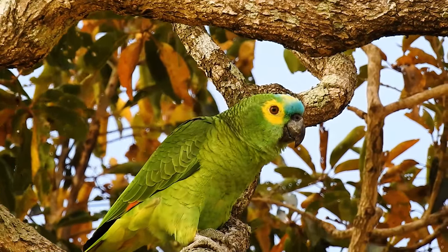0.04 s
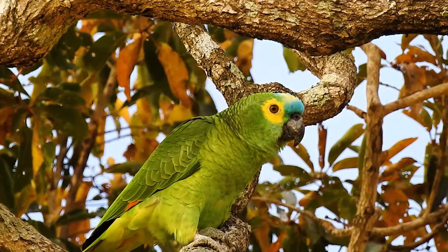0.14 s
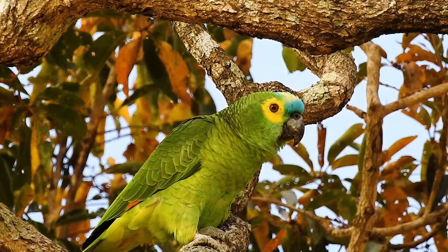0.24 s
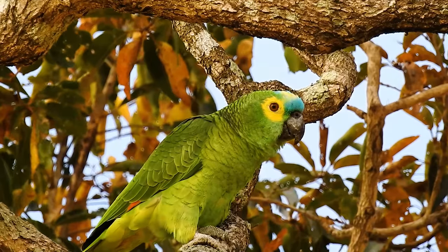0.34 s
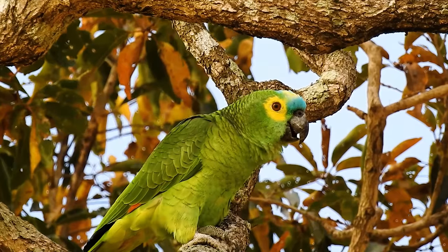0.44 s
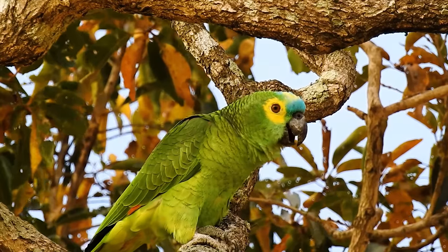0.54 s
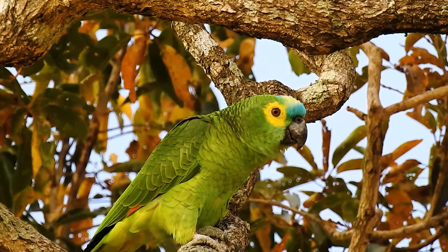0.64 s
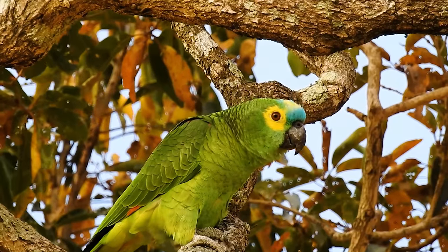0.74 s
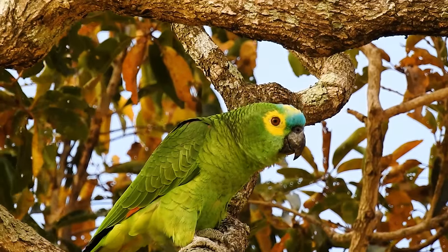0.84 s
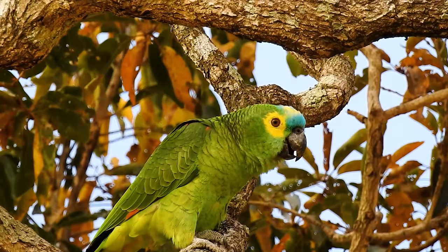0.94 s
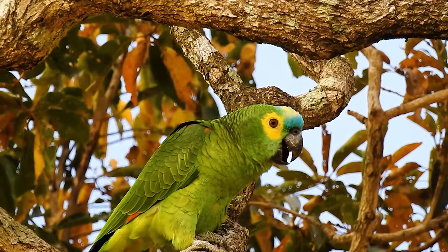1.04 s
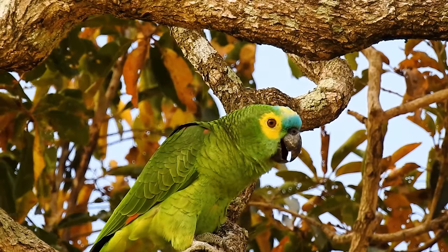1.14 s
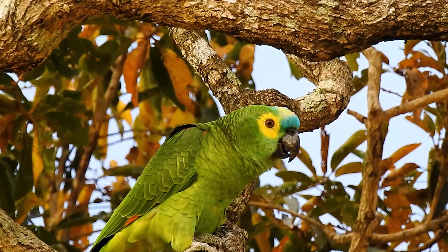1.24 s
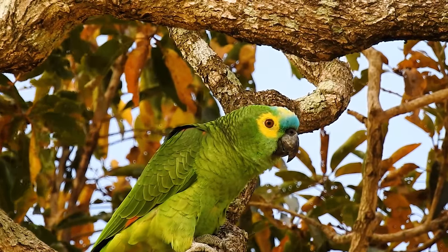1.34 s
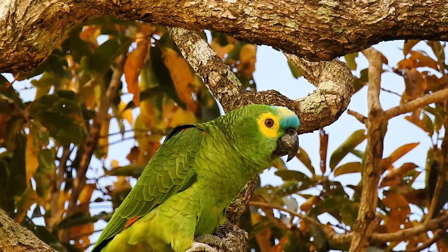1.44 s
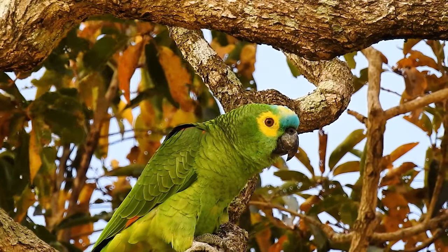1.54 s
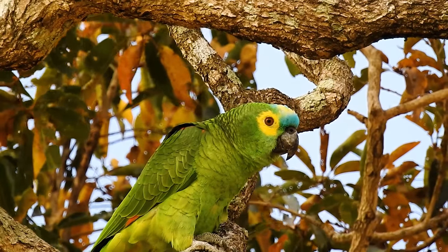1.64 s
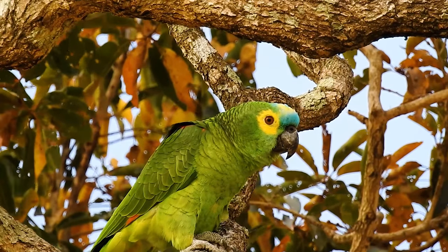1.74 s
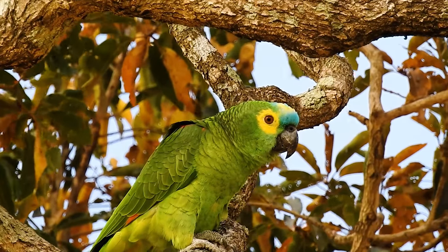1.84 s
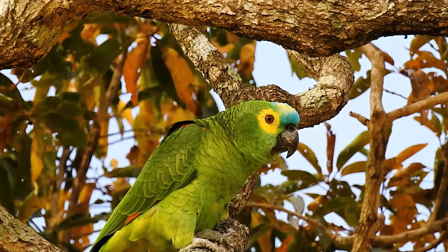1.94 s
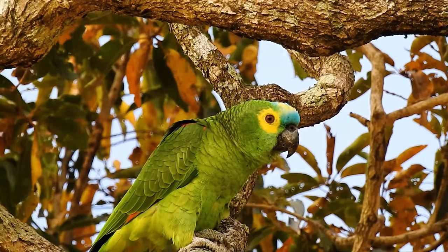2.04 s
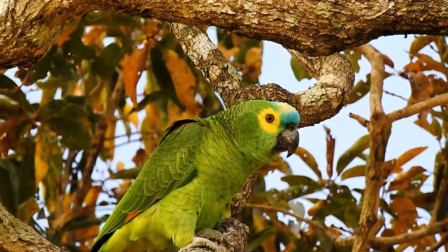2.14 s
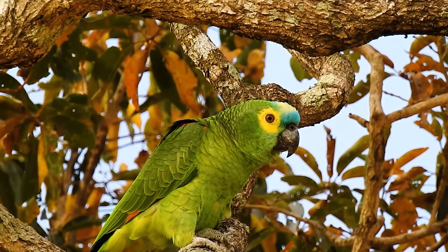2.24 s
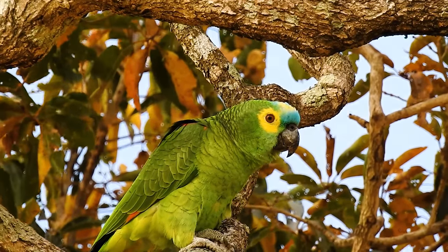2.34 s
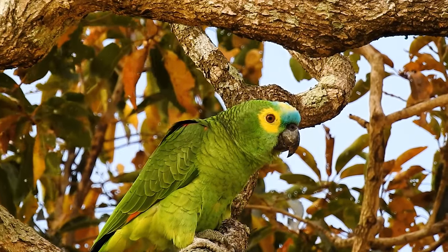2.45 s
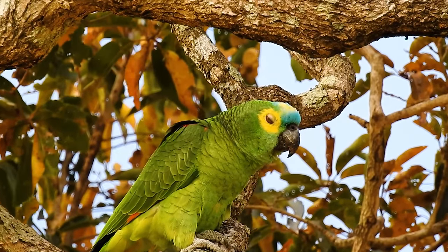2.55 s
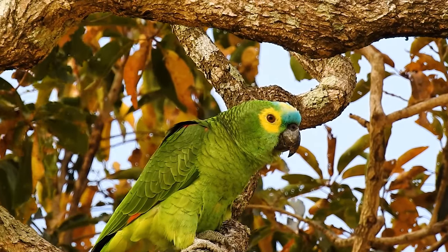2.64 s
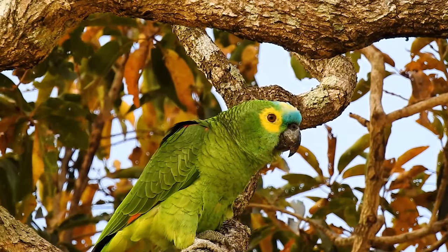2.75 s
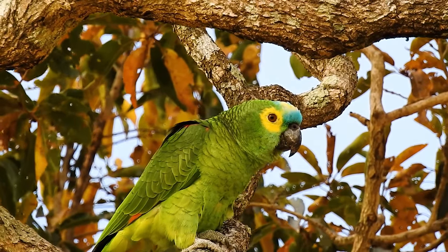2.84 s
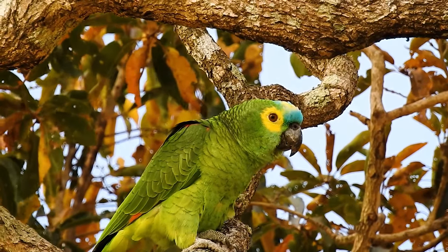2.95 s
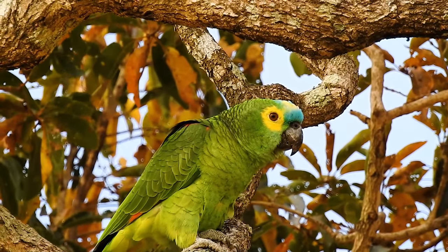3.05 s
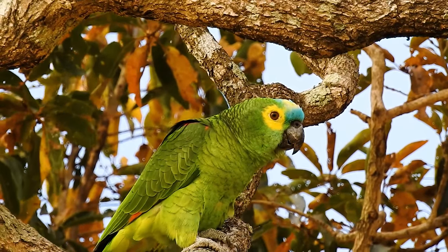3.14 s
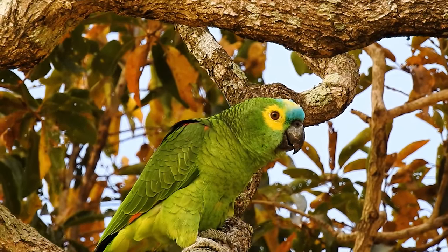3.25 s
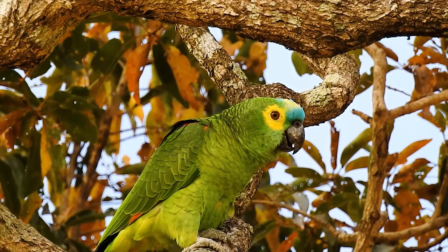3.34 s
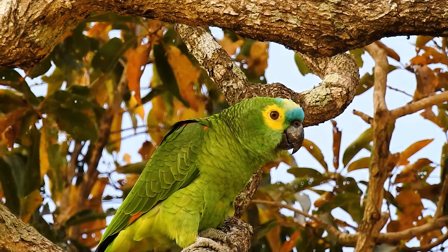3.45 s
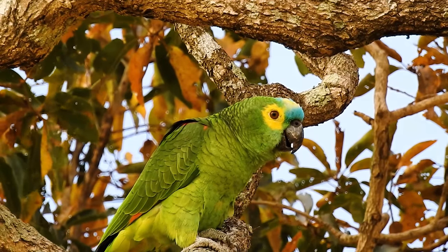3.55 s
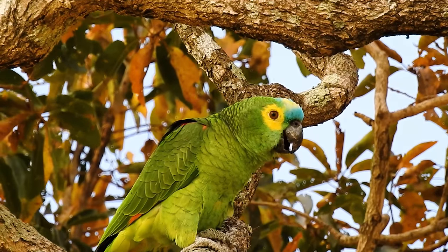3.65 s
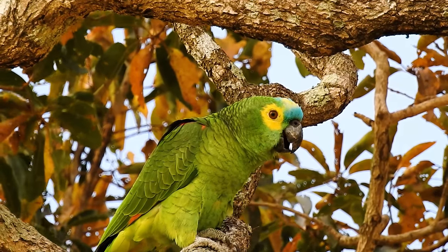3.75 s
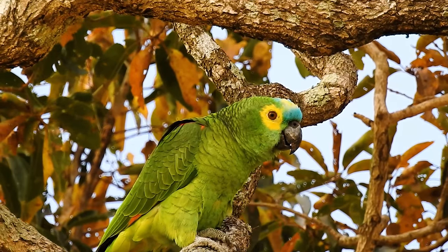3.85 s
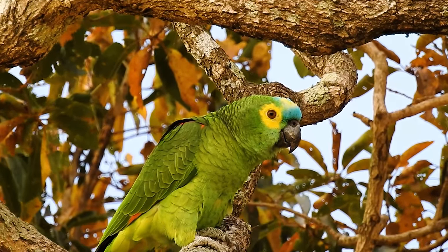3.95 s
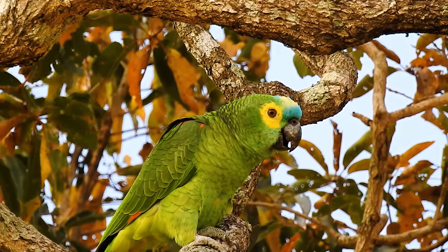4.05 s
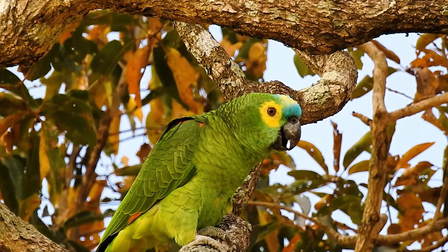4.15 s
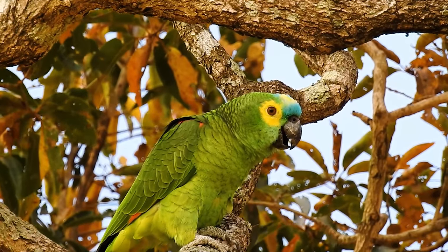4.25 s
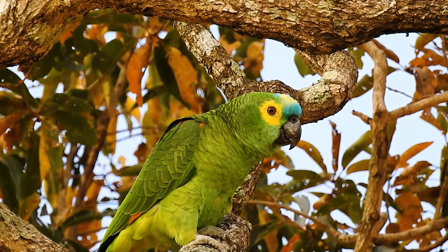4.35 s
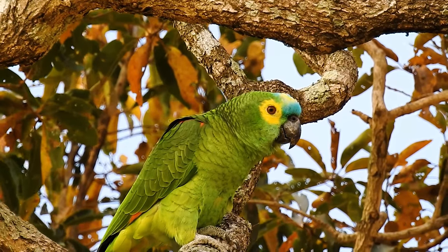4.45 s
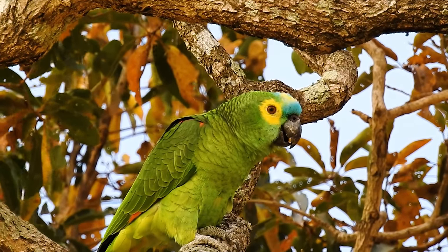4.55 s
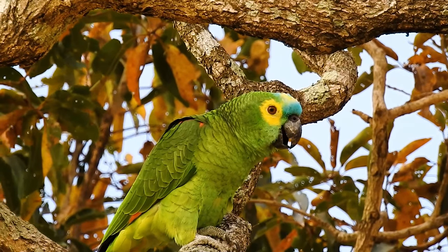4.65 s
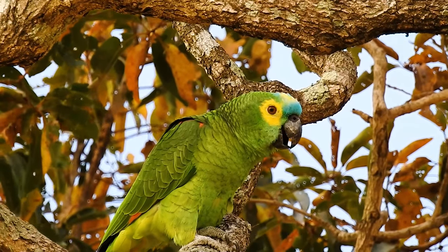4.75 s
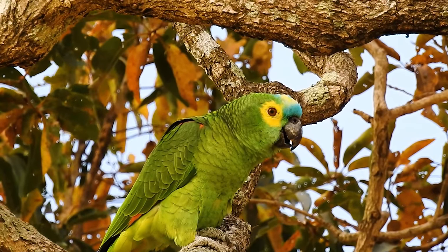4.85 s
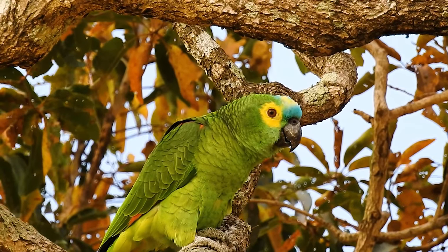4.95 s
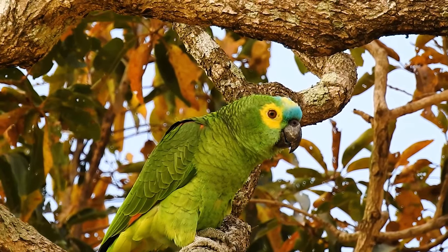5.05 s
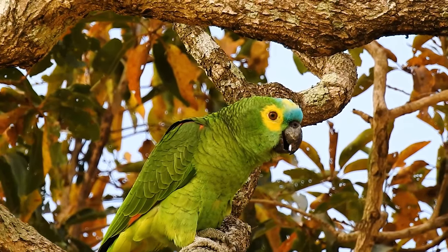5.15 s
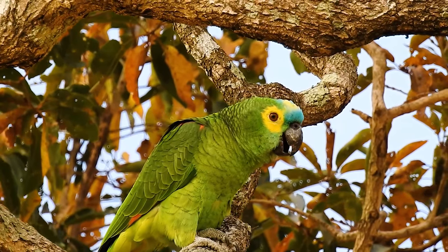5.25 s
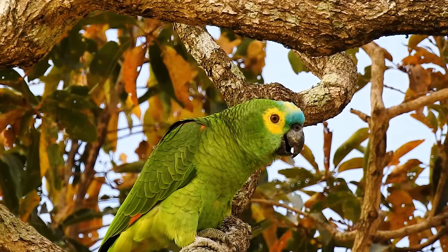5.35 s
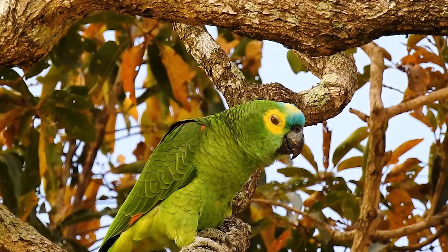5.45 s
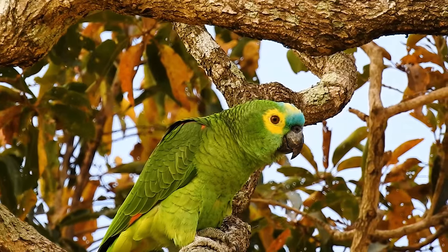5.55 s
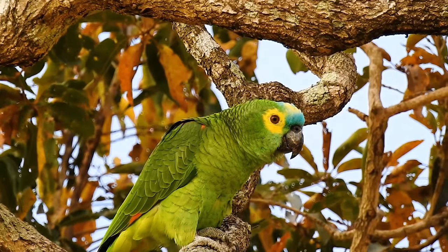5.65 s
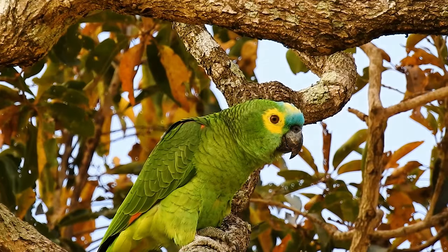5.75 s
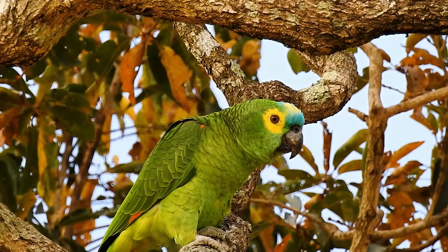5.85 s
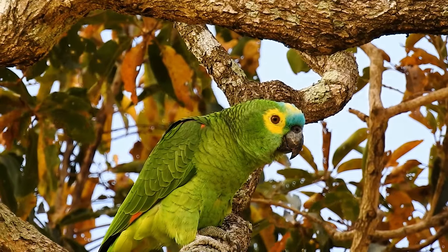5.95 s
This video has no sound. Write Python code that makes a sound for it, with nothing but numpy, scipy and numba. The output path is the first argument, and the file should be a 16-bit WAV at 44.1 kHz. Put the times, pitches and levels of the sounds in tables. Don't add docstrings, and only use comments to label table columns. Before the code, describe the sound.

A parrot in a tree gives harsh squawks, a cracking scream and beak clicks, then four rolled squawks, over faint leaf and insect hiss.

```python
import sys
import numpy as np
from scipy import signal
from scipy.io import wavfile
from scipy.ndimage import uniform_filter1d
from numba import njit

SR = 44100
rng = np.random.default_rng(int(sys.argv[2]) if len(sys.argv) > 2 else 0)


def materialize(psi):
    bounded = np.clip(np.atleast_2d(psi).T, -1, 1)
    quanta = np.round(bounded * 32767).astype(np.int16)
    wavfile.write(sys.argv[1], SR, quanta)


def undo_db(level):
    steps = np.asarray(level, float) / 20
    return 10 ** steps


N = 264159
TIME_S = np.arange(N) / SR

# start [s], length [s], first pitch [Hz], last pitch [Hz], level [dB].
BREAKS = [
    (0.623, 0.009, 1200, 1920, -31),
    (0.63, 0.004, 1987, 1293, -28),
    (0.65, 0.0047, 1380, 2230, -14),
    (0.654, 0.0074, 2120, 1442, -26),
    (0.672, .016, 2147, 2068, -22.5),
    (1.157, .011, 1440, 2090, -26.5),
    (1.162, 0.0051, 2090, 2060, -9),
    (1.223, 0.0081, 2630, 2240, -13),
    (1.265, 0.018, 2568, 2376, -15),
    (3.533, 0.0068, 2276, 2190, -32),
]


def level(x, db):
    return x * undo_db(db) / np.sqrt(np.mean(x ** 2))


@njit
def svf(x, g, k):
    y = x.copy()
    for _ in range(2):
        b, l = 0., 0.
        for i in range(len(x)):
            v = (b + g[i] * (y[i] - l)) / (1 + g[i] * (g[i] + k[i]))
            b, l, y[i] = 2 * v - b, l + 2 * g[i] * v, k[i] * v
    return y


def ring(x, modes):
    flat = np.zeros(len(x))
    out = 0
    for hz, width_hz, db in modes:
        out = out + undo_db(db) * svf(x, np.tan(np.pi * hz / SR) + flat, width_hz / hz + flat)
    return out


def walk(rate_hz):
    hold = int(SR / rate_hz)
    steps = np.repeat(rng.standard_normal(N // hold + 1), hold)
    return 1.5 * uniform_filter1d(uniform_filter1d(steps, hold), hold)[:N]


def whistles(table, wobble_db):
    out, duck_db, waver = np.zeros(N), np.zeros(N), walk(250)
    for start_s, length_s, first_hz, last_hz, db, second_db, third_db, gap_db in table:
        span = slice(int(start_s * SR), int((start_s + length_s) * SR))
        u = np.linspace(0, 1, span.stop - span.start)
        shape = np.clip(np.minimum(u, 1 - u) * length_s / 0.003, 0, 1)
        hz = (first_hz + u * (last_hz - first_hz)) * (1 + 0.004 * waver[span])
        turn = 2 * np.pi * np.cumsum(hz) / SR
        tone = np.sin(turn) + undo_db(second_db) * np.sin(2 * turn) + undo_db(third_db) * np.sin(3 * turn)
        out[span] += shape * undo_db(db + 3 + wobble_db * waver[span]) * tone
        duck_db[span] += shape * gap_db
    return out, duck_db


def woods(bird):
    # frequency [Hz], density [dB per Hz].
    hiss_spectrum = [(180, -71), (300, -46), (877, -8.5), (937, -14.5), (1220, -5.5), (1880, -1.5),
                     (2040, -10.5), (2830, -2.5), (3290, -8), (4280, -1.5), (6690, 2), (8710, -12.5),
                     (15500, -19.5)]
    steady_db, scatter_db, scatter_s = -56.5, -40, 0.12
    out, gust = np.zeros((2, N)), walk(0.22)
    spectrum_hz, spectrum_db = np.transpose(hiss_spectrum)
    for hz in 300 * 2 ** np.arange(0, 5.8, 1 / 3):
        band = [(hz, hz / 3 * (1 + (hz / 12000) ** 2), 0)]
        mid = ring(rng.standard_normal(N), band)
        side = ring(rng.standard_normal(N), band)
        db = np.interp(np.log(hz), np.log(spectrum_hz), spectrum_db) + 0.6 * gust + walk(9)
        bass = np.hypot(1, (950 / hz) ** 2)
        width = min(0.52 + hz / 23000, 1)
        out += undo_db(db) * bass * (mid + width * side * np.array([[1], [-1]]))
    samples = scatter_s * SR
    swell = signal.lfilter([1 / samples], [1, 1 / samples - 1], bird ** 2)
    return level(out, 0) * np.sqrt(undo_db(2 * steady_db) + undo_db(2 * scatter_db) * swell)


def far_birds():
    # start [s], length [s], first pitch [Hz], last pitch [Hz], level [dB].
    chirps = [
        (2.27, 0.05, 1810, 1910, -71),
        (2.34, 0.035, 2010, 1750, -71.5),
        (3.022, 0.068, 2300, 2500, -72),
        (3.103, 0.048, 1570, 1570, -74),
        (5.88, 0.068, 2080, 1893, -69),
    ]
    out, _ = whistles([(*row, -30, -30, 0) for row in chirps], 5.0)
    return out


def far_tree_line(bird):
    t60_s, far_db, ridge_s, ridge_db = 1.5, -28, 0.45, 9
    bump_db = ridge_db * np.exp(-((TIME_S - ridge_s) / 0.022) ** 2)
    patches = rng.standard_normal((2, N)) * undo_db(1.8 * walk(20) + bump_db)
    patches = patches * 0.0015 ** (TIME_S / t60_s) * np.minimum(TIME_S / 0.08, 1)
    band = ring(bird, [(2420, 380, -1.5), (4170, 830, 3.0)])
    echo = np.array([signal.fftconvolve(band, p)[:N] for p in patches])
    return undo_db(far_db) * echo / np.sqrt(SR / 10)


@njit
def trunks(x, lags, gain, damp):
    line, soft, out = np.zeros((8, 8192)), np.zeros(8), np.zeros((2, len(x)))
    for i in range(len(x)):
        total = 0.
        for k in range(8):
            soft[k] += (1 - damp) * (gain[k] * line[k, (i - lags[k]) & 8191] - soft[k])
            total += soft[k]
            out[k % 2, i] += soft[k]
        for k in range(8):
            line[k, i & 8191] = x[i] + soft[k] - total / 4
    return out


def near_trees(bird):
    t60_s, damp, trees_db = 0.38, 0.1, -29
    lags = rng.integers(300, 2600, 8)
    return undo_db(trees_db) * trunks(bird, lags, undo_db(-60 * lags / SR / t60_s), damp)


def boughs(bird):
    decay_s, bough_db, apart = 0.005, -6, 0.67
    t = np.arange(500) / SR
    both, left, right = rng.standard_normal((3, len(t))) * np.exp(-t / decay_s) * (t > 0.0003)
    ports = []
    for own in (left, right):
        echo = np.diff(both + apart * np.diff(own, prepend=0))
        echo = level(echo, bough_db) / np.sqrt(len(t))
        ports.append(bird + signal.fftconvolve(bird, echo)[:N])
    return np.array(ports)


def beak_clicks():
    # time [s], peak level [dB].
    snaps = [
        (1.963, -41.5),
        (2.46, -21.5),
        (2.5056, -33.5),
    ]
    # frequency [Hz], level [dB], t60 [s].
    horn_modes = [(3550, -33, 0.013), (4490, -11, 0.0125), (5700, -8, 0.0059), (6840, -13, 0.0049),
                  (8550, -22, 0.0057), (10370, -41, 0.04)]
    out, t = np.zeros(N), np.arange(1500) / SR
    for at_s, peak_db in snaps:
        snap = np.zeros(len(t))
        for hz, db, t60_s in horn_modes:
            size = undo_db(db + 2.0 * rng.standard_normal())
            snap += size * np.sin(2 * np.pi * hz * t) * 0.001 ** (t / t60_s)
        snap *= np.minimum(t / 0.00067, 1)
        start = int(at_s * SR)
        out[start:start + len(t)] += snap / np.abs(snap).max() * undo_db(peak_db)
    return out


def calls():
    # time [s], pitch [Hz], level [dB], mouth resonance [Hz], beak resonance [Hz].
    tail_end = [(0, 629, -11.5, 2550, 6000), (0.016, 625.6, -14.5, 2270, 6200),
                (0.036, 564, -15, 2480, 6400), (0.056, 534.4, -13.5, 2320, 5670),
                (0.068, 491.5, -19.5, 2410, 5770), (0.1, 418, -41.5, 2200, 5640)]
    croak = [(0.556, 431, -59, 1790, 7150), (0.575, 456, -35, 1780, 7040), (0.598, 596.3, -31, 1902, 7040),
             (0.643, 692.4, -28.5, 1710, 7370), (0.691, 682.4, -21.5, 2050, 5700),
             (0.726, 654.4, -27.5, 2080, 5500), (0.746, 599.3, -26, 1810, 7170),
             (0.772, 534.5, -29.5, 1644, 6500), (0.805, 465, -61, 1820, 6440)]
    scream = [(1.093, 428.8, -53, 1980, 6860), (1.109, 460.8, -31.5, 1960, 6930),
              (1.126, 576.4, -26, 2013, 5720), (1.157, 694.4, -24.5, 2000, 5700),
              (1.248, 698.2, -16.5, 2400, 6438), (1.285, 669.5, -15, 2430, 6850),
              (1.315, 580.6, -24, 2290, 6280), (1.346, 526, -19.5, 1831, 6210),
              (1.387, 425.6, -41.5, 2150, 5650)]
    rising = [(3.222, 400, -54.5, 2070, 6260), (3.252, 408, -36.5, 2070, 6200),
              (3.3, 416.4, -30.5, 2200, 6150), (3.341, 460.5, -25.5, 2314, 6080),
              (3.38, 522.4, -25.5, 2217, 6163), (3.4, 600.7, -37.5, 2242, 6125),
              (3.415, 614, -31, 2440, 6230), (3.45, 636.7, -33, 2430, 6260),
              (3.483, 703.6, -33.5, 2365, 6027)]
    hiccup = [(3.535, 607.6, -57, 2464, 6130), (3.542, 552.8, -43.5, 2400, 6130),
              (3.551, 497.2, -54, 2347, 6130)]
    # start [s], rise [s], fall [s], top pitch [Hz], level [dB].
    squawks = [
        (3.723, 0.15, 0.13, 588.4, -23.5),
        (4.201, 0.13, 0.16, 613.8, -21.5),
        (4.714, .156, 0.16, 605.6, -22),
        (5.277, 0.14, 0.14, 634, -22),
    ]
    # stage [0 start, 1 top, 2 end], share of pitch climb or drop [0-1], level [dB],
    # mouth resonance [Hz], beak resonance [Hz].
    course = [(0, 0.0, -15.5, 2200, 6260), (.06, 0.2, -4.5, 2099, 6060), (.32, .35, 1.5, 2300, 6400),
              (0.651, .85, -0.5, 2420, 6280), (1.001, 0.97, 1.5, 2563, 6461), (1.18, .94, -1, 2640, 6400),
              (1.56, .52, 0.5, 2466, 6440), (1.83, .12, -7, 2623, 6200), (2.0, 0.0, -22.5, 2526, 6050)]
    first_hz, last_hz = 499, 400
    stage, share, db, mouth_hz, beak_hz = np.transpose(course)
    low_hz = np.where(stage < 1, first_hz, last_hz)
    table = [np.array(c) for c in (tail_end, croak, scream, rising, hiccup)]
    for start_s, rise_s, fall_s, top_hz, call_db in squawks:
        s = start_s + np.minimum(stage, 1) * rise_s + np.maximum(stage - 1, 0) * fall_s
        table.append(np.c_[s, low_hz + share * (top_hz - low_hz), call_db + db, mouth_hz, beak_hz])
    return table


def roll():
    # first closing [s], last closing [s], first depth [dB], last depth [dB], push [dB].
    runs = [
        (3.239, 3.385, -20.5, -12.5, 1),
        (3.741, 3.873, -18, -10, 4.5),
        (4.217, 4.352, -14, -11.5, 0.5),
        (4.73, 4.914, -17, -11, 0.5),
        (5.293, 5.428, -14, -8.5, -0.5),
    ]
    rate_hz, slowing = 51.5, 0.04
    close_s, open_s, edge = 0.0056, 0.0034, 2.6
    shut, choke_db, rolling = np.zeros(N), np.zeros(N), np.zeros(N)
    t = np.arange(-800, 800) / SR
    dip = np.exp(-0.5 * np.abs(t / np.where(t < 0, close_s, open_s)) ** edge)
    for first_s, last_s, first_db, last_db, push_db in runs:
        length_s = last_s - first_s
        on = np.interp(TIME_S, [first_s - 0.02, first_s, last_s, last_s + 0.012], [0, 1, 1, 0])
        rolling += on
        choke_db += push_db * on
        for u in np.linspace(0, 1, 1 + round(length_s * rate_hz)):
            at_s = first_s + length_s * (u - slowing * u * (1 - u))
            i = int(at_s * SR) - len(t) // 2
            shut[i:i + len(t)] += dip
            choke_db[i:i + len(t)] += (first_db + u * (last_db - first_db)) * dip
    return shut, choke_db, rolling


def strain():
    # time [s], strength [0-1].
    cracks = [
        (0.003, 0.54),
        (0.058, 0),
        (0.58, 0.08),
        (1.112, 0.63),
        (1.302, 0.76),
        (1.326, 0.79),
        (1.346, .5),
        (3.468, 0.96),
    ]
    spread_s = 0.0056
    spans = [(s + d / 2, d / 2, 1) for s, d, *_ in BREAKS]
    spans += [(s, 0, strength) for s, strength in cracks]
    bumps = [strength * np.exp(-((TIME_S - s) / (spread_s + half_s)) ** 2) for s, half_s, strength in spans]
    return np.max(bumps, axis=0)


def squeals():
    # start [s], length [s], pitch [Hz], level [dB], overtones [dB].
    held = [
        (3.472, 0.0598, 2308, -39, 1),
        (3.543, 0.092, 2326, -58, -13),
    ]
    second_db, third_db, gap_db = -4, -8.5, -18.5
    rows = [(*b, second_db, third_db, gap_db) for b in BREAKS]
    rows += [(s, d, hz, hz, db, over_db, over_db, 0) for s, d, hz, db, over_db in held]
    return whistles(rows, 1.2)


def syrinx(hz, rough, jitter=0.07, shimmer_db=5.0, breath=0.4):
    phase = np.cumsum(hz) / SR
    at = np.interp(np.arange(1, int(phase[-1])), phase, np.arange(N))
    early, strong = rng.standard_normal((N // 40, 2))[:len(at)].T
    here = at.astype(int)
    at = np.clip(at + jitter * rough[here] * early * SR / hz[here], 8, N - 9)
    size = undo_db(shimmer_db * rough[here] * strong) * np.sqrt(SR / hz[here])
    taps = at.astype(int)[:, None] + np.arange(-7, 9)
    off = taps - at[:, None]
    kernel = np.sinc(off) * np.cos(np.pi * off / 16) ** 2
    pulses = np.bincount(taps.ravel(), (size[:, None] * kernel).ravel(), N)
    puff = np.exp(-(phase % 1) / 3.6) * rng.standard_normal(N)
    return pulses * np.sqrt(1 - 0.93 * rough) + 2 * breath * rough * puff


def smear(x):
    for lag in (11, 29, 47):
        taps = np.r_[1, np.zeros(lag - 1), 0.55]
        x = signal.lfilter(taps[::-1], taps, x)
    return x


def colour(db, ends_s, rolling, cracked):
    # throat [dB], beak [dB], windpipe [dB], roughness [0-1].
    opening = [
        (2.5, 0.5, -15, 0.4),
        (-2, -1.5, -5, 0.3),
        (-2.5, -1.5, -0.5, .15),
        (-0.5, 2, -7, 0.38),
        (-20, 2, 1, .3),
        (-2.5, -1, -12, 0.3),
        (-3, 4, -12, 0.4),
        (-0.5, -0.5, -12, 0.5),
        (-2, 2.5, -13, 0.3),
    ]
    # throat [dB], beak [dB], windpipe [dB], roughness [0-1].
    closing = [
        (5, 6, -11, .15),
        (-2.5, -3.5, -3.5, .1),
        (0, 2.5, -10.5, 0.047),
        (-3, -1.5, -16, 0.107),
        (2, -15, 0, .3),
        (4, 3.5, -14.5, .13),
        (3, 2, -12.5, 0.19),
        (1, 4.5, -13.5, .12),
        (1, 2, -14, 0.41),
    ]
    # time [s], throat [dB], beak [dB].
    flares = [(0.033, 2.5, 7.5), (0.6, 3, -0.5), (0.745, 12, 1), (1.134, 10.5, 3.5), (1.2, -4.5, 2),
              (1.25, 5.5, 6), (1.335, -5.5, 3), (3.336, 4, -0.5), (3.888, 4.5, 3.5), (3.924, -12.5, -5),
              (4.39, -3.5, -5), (4.42, 2, -4.5), (4.934, -1, -4.5), (5.471, 0.5, -4), (5.497, -3, -4.5)]
    # throat, beak, windpipe [dB per dB].
    gain_when_faint = (.4, 0.13, .7)
    usual_db, faint_db, wander_db, wander_hz = -22, -34, 2.0, 40
    roll_bright_db, break_windpipe_db, flare_s = 1.5, -25.5, 0.01
    ends = np.concatenate(list(zip(opening, closing))).T
    *steady_db, rough = (np.interp(TIME_S, ends_s, c) for c in ends)
    sunk_db = usual_db - np.maximum(db, faint_db)
    parts_db = []
    for part_db, gain in zip(steady_db, gain_when_faint):
        parts_db.append(part_db + gain * sunk_db + wander_db * walk(wander_hz))
    parts_db[0] += roll_bright_db * rolling
    for at_s, throat_db, beak_db in flares:
        bump = np.exp(-((TIME_S - at_s) / flare_s) ** 2)
        parts_db[0] += throat_db * bump
        parts_db[1] += beak_db * bump
    parts_db[2] += break_windpipe_db * cracked
    return parts_db, rough


def tract(source, mouth_hz, beak_hz, parts_db):
    # frequency [Hz], width [Hz], level [dB].
    throat = [(3600, 400, 0), (4550, 600, -3)]
    beak_rim = [(5410, 590, -6.5), (7254, 420, -8), (8080, 360, -16), (11300, 3500, -18)]
    cheek = [(1581, 546, -12.5)]
    windpipe = [(1338, 613, -0.5), (594, 530, -14)]
    mouth_width_hz, beak_width_hz = 634, 600
    out = level(ring(source, [(mouth_hz, mouth_width_hz, 0)] + cheek), 0)
    parts = [throat, [(beak_hz, beak_width_hz, 0)] + beak_rim, windpipe]
    for part, part_db in zip(parts, parts_db):
        out = out + level(ring(source, part), 0) * undo_db(part_db)
    return out / np.sqrt(1 + sum(undo_db(2 * part_db) for part_db in parts_db))


def parrot():
    voice_top_hz, roll_sag, surge_db = 8200, 0.036, 8
    clear_rough_max, roll_rough, break_rough = 0.17, 0.13, 0.87
    rough_per_db, strain_below_db = 0.045, 9
    table = calls()
    s, *columns = np.concatenate(table).T
    hz, db, mouth_hz, beak_hz = (np.interp(TIME_S, s, c) for c in columns)
    ends_s = np.ravel([c[[0, -1], 0] for c in table])
    peak_db = np.interp(TIME_S, ends_s, np.repeat([c[:, 2].max() for c in table], 2))
    voiced = np.zeros(N)
    for c in table:
        first_s, last_s = c[0, 0], c[-1, 0]
        voiced += np.interp(TIME_S, [first_s - 0.004, first_s, last_s, last_s + 0.0068], [0, 1, 1, 0])
    shut, choke_db, rolling = roll()
    cracked = strain()
    parts_db, clear = colour(db, ends_s, rolling, cracked)
    rough = np.minimum(clear, clear_rough_max) + roll_rough * rolling + break_rough * cracked
    rough += rough_per_db * np.maximum(peak_db - strain_below_db - db, 0)
    source = smear(syrinx(hz * (1 - roll_sag * shut), np.clip(rough, 0, 1) ** 1.3))
    soft = signal.butter(8, voice_top_hz, fs=SR, output="sos")
    source = signal.sosfilt(soft, source) + undo_db(-24) * source
    voice = tract(source, mouth_hz, beak_hz, parts_db)
    whistle, duck_db = squeals()
    return voice * undo_db(db + surge_db * cracked + choke_db + duck_db) * voiced + whistle


def scene():
    bird = parrot() + beak_clicks()
    near = boughs(bird)
    near[0] -= 0.26 * ring(near[0], [(5200, 6000, 0)])
    return near * undo_db(-1) + near_trees(bird) + far_tree_line(bird) + woods(bird) + far_birds()


def top_cut(x):
    return signal.sosfilt(signal.butter(12, 15670, fs=SR, output="sos"), x)


def record(dry):
    open_click_db = (-46, -37.5)
    x = signal.sosfilt(signal.butter(5, 900, "high", fs=SR, output="sos"), dry)
    x += undo_db(open_click_db)[:, None] * np.exp(-TIME_S / 0.0003)
    return top_cut(x)


dry = scene()
out = record(dry)
materialize(out)
```